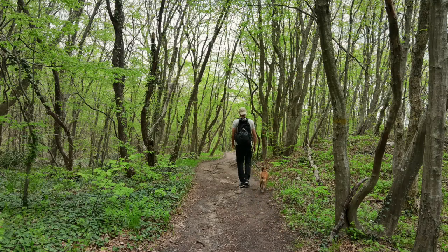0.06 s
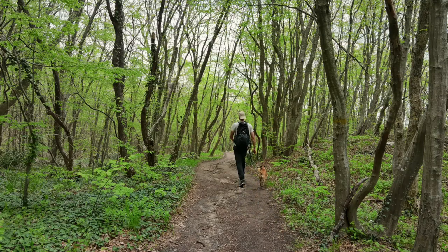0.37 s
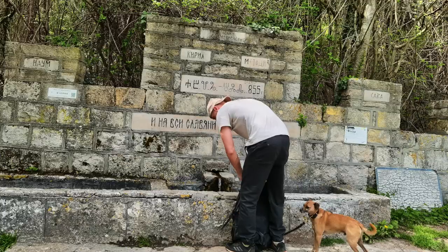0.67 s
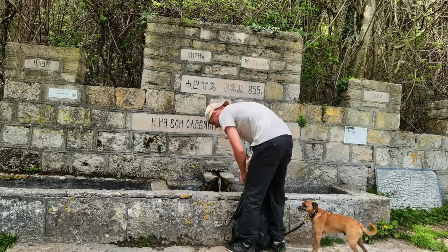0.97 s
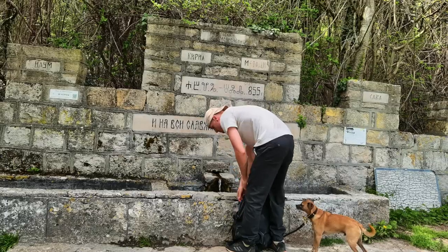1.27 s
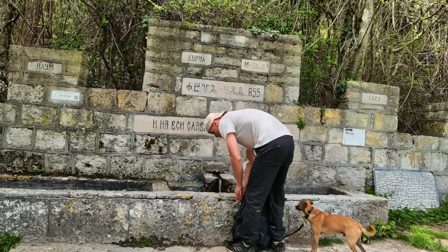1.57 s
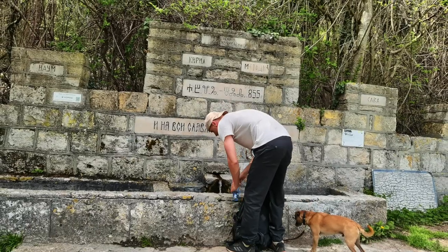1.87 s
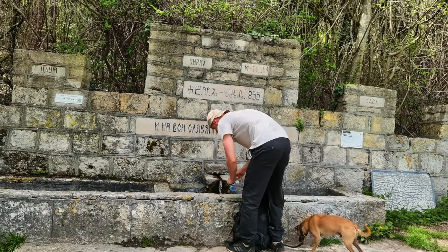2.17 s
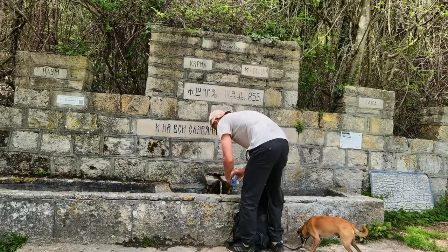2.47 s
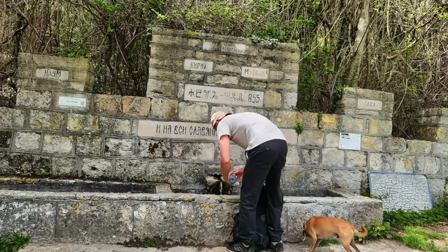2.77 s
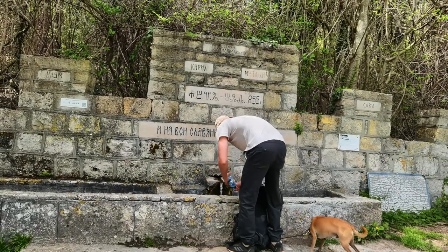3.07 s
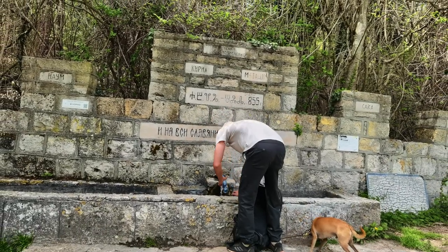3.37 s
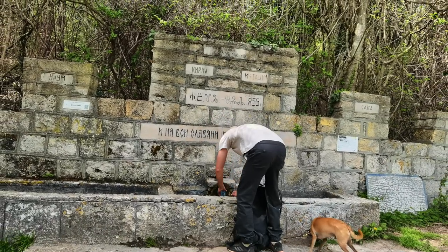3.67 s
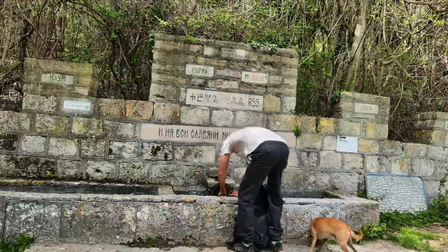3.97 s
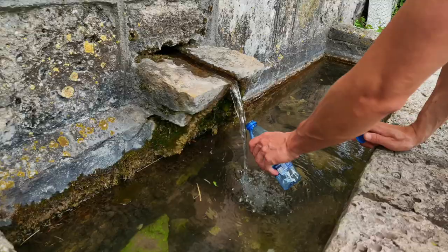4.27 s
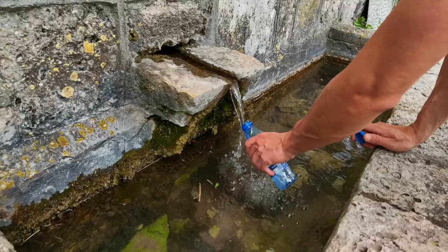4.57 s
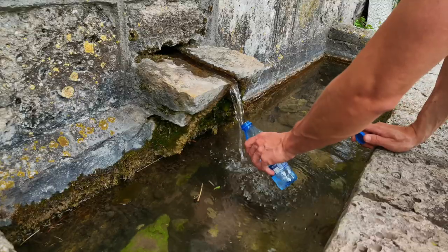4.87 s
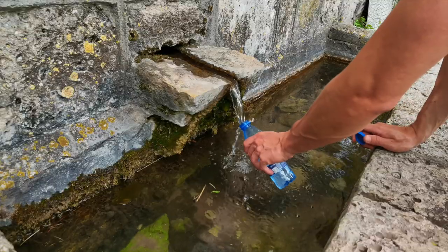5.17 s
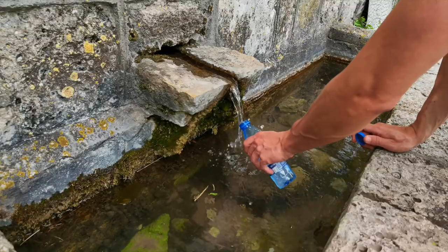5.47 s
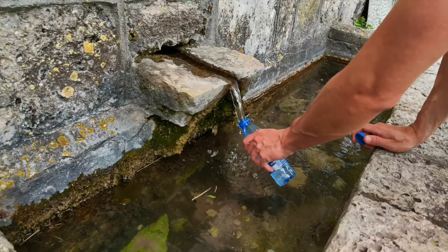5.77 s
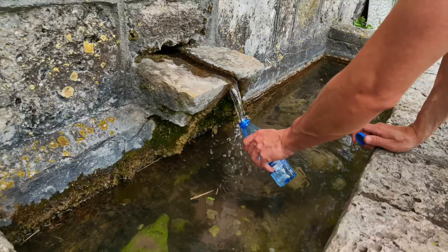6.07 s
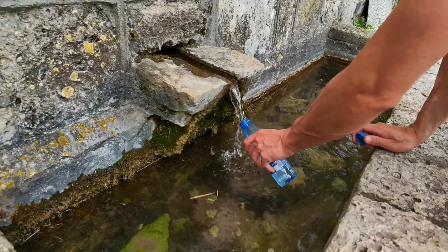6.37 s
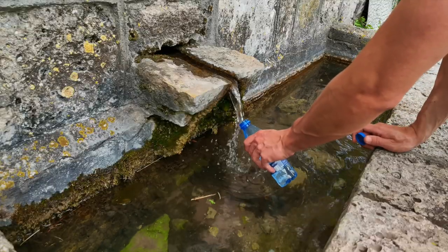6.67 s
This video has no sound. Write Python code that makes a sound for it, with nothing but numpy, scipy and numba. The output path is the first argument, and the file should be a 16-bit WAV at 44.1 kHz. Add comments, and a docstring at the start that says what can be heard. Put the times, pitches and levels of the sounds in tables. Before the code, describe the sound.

Faint footsteps and a distant trickle, then close water splashing from a spout into a trough and filling a plastic bottle.

```python
"""Footsteps crunch along a quiet forest path. At 0.7 s we cut to a stone fountain some metres away: it
trickles and splashes, a bird whistles thinly, feet shift and a plastic bottle ticks in the hand.
At 4.2 s we are at the spout, where the jet splashes round the bottle's neck and into the trough: a swarm
of ringing bubbles and bursting drops that follows the spill, with single gulps and splashes on top.
From about 5 s the jet finds the neck, and the bottle's note climbs as its air space shrinks."""
import sys
import numpy as np
from scipy import signal
from scipy.fft import rfft, irfft
from scipy.io import wavfile
from numba import njit

SR = 44100
rng = np.random.default_rng(int(sys.argv[2]) if len(sys.argv) > 2 else 0)


def digitize_waveform(pressure):
    """Quantize a signal to 16-bit integers and store it at the path in sys.argv[1].

    Rows of a 2-D input are taken as channels; values are limited to [-1, 1].
    """
    field = np.atleast_2d(pressure).T
    bounded = np.clip(field, -1, 1)
    quanta = np.round(bounded * 32767).astype(np.int16)
    wavfile.write(sys.argv[1], SR, quanta)


N = 301110
TIME = np.arange(N) / SR
FOUNTAIN_S, CLOSE_S = .675, 4.18  # the two cuts: to the fountain, then right up to the spout

# how much of the jet spills past the neck, as a fader ride (time [s], level [dB])
SPILL = [(4.25, -49.5), (4.36, -46), (4.4, -46), (4.68, -51.5), (4.95, -45), (5.05, -44), (5.3, -53.5),
         (5.57, -55.5), (6.24, -59.5), (6.45, -63), (6.65, -50), (6.83, -52.5)]
# EQ of the bright spray, the midrange bubbling and the deep churn (frequency [Hz], gain [dB])
SPRAY_EQ = [(1350, -34), (2300, -3), (2510, -11), (3050, -6.5), (3870, -5), (4550, -8), (5220, -3),
            (6760, -4.5), (8840, -9), (10300, -15.5), (13600, -4.5), (15100, -6), (16000, -19)]
BUBBLING_EQ = [(380, -52), (650, -30), (705, -8), (1040, 3), (1140, -7.5), (1310, 3), (1660, -3.5),
               (1970, -4), (2150, -6.5), (2600, -18), (3380, -31), (5720, -120)]
CHURN_EQ = [(180, -29.5), (300, -29), (334, -52), (388, 2), (549, 0.5), (720, -28), (940, -36),
            (1580, -120)]


def jet(full_spill_db=-45):
    """The stream close up: bubble layers from fine mist to the pool's thrum, all riding the spill."""
    spill_db = curve(SPILL) - full_spill_db
    fizz = level(swarm(1500, 2343, 7290, cycles=58, spread_db=7.5))
    patter = level(swarm(3500, 2430, 7650, cycles=20, spread_db=7.5, clump_s=.0015))
    spray = colour(reverb(fizz + patter, t60=.023, wet_db=-2.5), SPRAY_EQ)
    mist = swarm(5200, 7550, 18500, cycles=39, spread_db=6.5, width=1.94, clump_s=.0015)
    mist = colour(reverb(mist, t60=.035, wet_db=11), SPRAY_EQ)
    bubbling = swarm(900, 646, 2640, cycles=23.4, spread_db=4.5)
    bubbling = colour(reverb(bubbling, t60=.044, wet_db=0), BUBBLING_EQ)
    churn = colour(swarm(470, 301.4, 763, cycles=11.7, spread_db=5.5, width=.49), CHURN_EQ)
    drops = drips()
    thrum = swarm(130, 138, 205, cycles=15, spread_db=3.5, width=.33)
    # (layer, level at full spill [dB], growth [dB per dB of spill], pan [dB])
    layers = [(spray, -41.8, 1, 2), (mist, -49, 1.14, -.8), (bubbling, -50.3, .8, 1.2),
              (drops, -58.5, .71, 1), (churn, -50.5, 1.5, 3.5), (thrum, -61, 1.7, 0)]
    out = np.zeros((2, N))
    for layer, db, growth, pan_db in layers:
        add(out, 0, level(layer, db) * undb(growth * spill_db), pan_db)
    return out * after(CLOSE_S)


def drips():
    """Single drops that ring clear of the stream; rms 1."""
    drops = swarm(110, 1000, 5200, cycles=69, spread_db=3, width=.36, per_drop=1)
    return level(reverb(drops, t60=.12, wet_db=-8))


# lumps of water landing
# (time [s], plink pitch [Hz], plink level [dB], spatter level [dB], relative body level [dB])
SPLASHES = [(.71, 3770, -39.5, -66, -60), (0.777, 4480, -58, -43.5, -57), (.8, 3800, -49, -42, -45),
            (1.017, 3800, -50, -48.5, -63), (1.3855, 3800, -43.5, -62, -72), (1.55, 3920, -35.5, -36, -62),
            (2.875, 4240, -51, -44, -51.5), (3.151, 3920, -49.5, -50.5, -72),
            (3.357, 2760, -48.5, -46, -61), (3.428, 3500, -59, -49, -76), (3.522, 3900, -42.5, -47, -72),
            (4.2084, 4280, -46, -26, -31), (4.261, 3700, -44, -47, -26.5), (4.2764, 4530, -50, -25.5, -39),
            (4.3328, 3480, -44, -30.5, -52), (4.428, 2910, -29, -41, -45), (4.499, 3050, -43, -41, -27.5),
            (4.545, 4900, -50, -30.5, -44), (4.5897, 3960, -31.5, -32, -58),
            (4.611, 3980, -38, -26.5, -32.5), (4.7106, 4140, -37, -21.5, -28),
            (4.739, 4630, -43, -26.5, -30), (4.798, 4180, -55, -25, -53), (4.937, 3440, -27.5, -29.5, -26),
            (4.9653, 3100, -27, -48, -46), (4.998, 4100, -38, -30, -32.5), (5.0797, 3860, -27, -29.5, -53),
            (5.17, 3600, -36, -29, -57), (5.553, 3480, -32, -40, -58), (5.6387, 1980, -31, -31.5, -45),
            (5.652, 3700, -26.5, -27.5, -33), (5.702, 3020, -37, -29, -47),
            (5.8016, 5250, -33.5, -37, -31.5), (5.891, 5620, -38.5, -46, -55),
            (6.131, 3835, -28.5, -42, -65), (6.221, 5670, -53, -39, -64), (6.43, 4900, -40.5, -40.5, -63),
            (6.4703, 4070, -53, -32, -67), (6.4878, 2610, -37, -44, -66), (6.542, 3900, -38.5, -30.5, -63),
            (6.631, 4420, -48, -27, -62), (6.66, 3110, -36, -33, -33.5), (6.7, 5060, -31.5, -31.5, -54),
            (6.7045, 3760, -46, -28, -38)]


def splashes(spatter_ratio=1.142, spread=1.451, highest_hz=7300):
    """A lump of water slaps down, traps one plinking bubble and shatters into bubbles of three sizes."""
    out = np.zeros((2, N))
    for s, hz, plink_db, spatter_db, body_db in SPLASHES + stray_splashes():
        top_hz = min(hz * spatter_ratio * spread, highest_hz)
        spatter = burst(top_hz / spread ** 2, top_hz, t60=.0044, spread_s=.0014)
        body = burst(807, 2190, t60=.018, spread_s=.001634)
        mist = burst(9200, 19000, t60=.005, spread_s=.002, width=7)
        mist_db = spatter_db + (-12 if s > CLOSE_S else -24)  # brighter close up
        add(out, s, undb(plink_db) * ring(hz, t60=.02, glide_per_s=6), pan_db=1)
        add(out, s, undb(spatter_db) * spatter, pan_db=3.5)
        add(out, s, undb(body_db - 6.5) * body, pan_db=4)
        add(out, s, undb(mist_db) * mist, pan_db=3)
    return reverb(out, t60=.088, wet_db=-3)


def stray_splashes(per_s=12, lo_hz=3050, hi_hz=4630, over_stream_db=10.5, scatter_db=1):
    """Lesser splashes at random moments, poking just out of the stream; rows as in SPLASHES."""
    span_s, rows = TIME[-1] - FOUNTAIN_S, []
    for when, pitch, force in rng.random((int(per_s * span_s), 3)):
        s = FOUNTAIN_S + when * span_s
        stream_db = curve(SPILL, s) if s > CLOSE_S else curve(TRICKLE, s) + TRICKLE_TRIM_DB
        db = stream_db + over_stream_db + scatter_db * (2 * force - 1)
        rows.append((s, lo_hz * (hi_hz / lo_hz) ** pitch, db - 3.5, db, db - 12))
    return rows


# big air bubbles (time [s], pitch [Hz], level [dB], glide [share of pitch per s])
GULPS = [(.751, 1664, -45, 2.5), (3.888, 1542, -51.5, 1.5), (4.438, 1987, -42, 2.5),
         (4.543, 540, -30.5, 2.5), (4.625, 1276, -34.5, 4), (4.661, 738, -37.5, 12.5),
         (4.672, 1002, -33, 17), (4.842, 491, -24, 3), (4.936, 1146, -34, 3.5), (4.945, 470, -36, 5),
         (5.027, 475, -27, 2), (5.108, 501, -30, 3.5), (5.17, 471, -37, -1.5), (5.193, 488, -31, 4.5),
         (5.723, 522, -26.5, 6), (5.777, 530, -34, 8.5), (5.79, 793, -42, 3.5), (6.154, 1330, -41.5, -1),
         (6.351, 1442, -39, 2), (6.729, 470, -35.5, 4), (6.742, 1312, -37, 3), (6.798, 485, -37, 1.5)]


def gulps(twin_ratio=1.18, twin_late_s=.0056, twin_db=-16.5, pan_db=3.5):
    """Big bubbles gulp and shed a smaller twin; most glide up as they near the surface."""
    out = np.zeros((2, N))
    for (s, hz, db, glide), chance in zip(GULPS, rng.random(len(GULPS))):
        t60 = .091 * (503 / hz) ** .22  # smaller bubbles die sooner
        add(out, s, undb(db) * ring(hz, t60, glide), pan_db)
        twin = undb(db + twin_db) * ring(hz * twin_ratio, t60 / 2)
        add(out, s + twin_late_s * (.5 + chance), twin, pan_db)
    return reverb(out, t60=.066, wet_db=1)


# fader ride of the drumming inside the bottle (time [s], relative level [dB])
DRUMMING = [(4.2, -54.5), (4.9, -51.5), (5.2, -63), (5.4, -50), (5.65, -67.5), (6.12, -59.5), (6.4, -68.5),
            (6.57, -51.5), (6.83, -68)]
# slugs of water that drop down the neck and thump the air inside (time [s], level [dB])
GLUGS = [(4.273, -32.5), (4.331, -33), (4.461, -33.5)]


def bottle(empty_hz=256.6, fill_start_s=5.05, fill_share_per_s=.432, drops_per_s=45):
    """Drops and slugs of water drum inside the bottle and ring its shrinking air space."""
    filled = np.clip(fill_share_per_s * (TIME - fill_start_s), 0, .9)
    hz = empty_hz / np.sqrt(1 - filled)  # the note goes as one over the root of the air volume
    drops = rng.uniform(-.64, 1, N) * (rng.random(N) < drops_per_s / SR)
    hum = level(band(cavity(drops, hz, width_hz=32.), 270, 610), -2.9)
    out = np.zeros((2, N))
    add(out, 0, hum * undb(curve(DRUMMING)) * after(CLOSE_S), pan_db=3)
    for s, db in GLUGS:
        add(out, s, undb(db) * ring(np.interp(s, TIME, hz), t60=.12), pan_db=.5)
    return out


# fader ride of the distant stream (time [s], level before the trim [dB])
TRICKLE = [(0.8, -70.5), (0.88, -71), (1.52, -75.5), (1.62, -71), (2.76, -74.5), (3.01, -72), (3.24, -74.5),
           (4.1, -72.5)]
TRICKLE_TRIM_DB = 6.5
# EQ of its fine bubbles (frequency [Hz], gain [dB])
TRICKLE_EQ = [(1350, -40), (2300, -7.5), (2490, -25.5), (2790, -4.5), (3370, -26.5), (3770, -5),
              (4440, -14), (6140, -11), (7700, -25.5), (9060, -27), (10100, -32.5), (12800, -21.5),
              (16000, -24.5)]


def trickle(drips_db=-10):
    """The stream from afar, its bubbles blurred by the trough and the wall."""
    plinks = level(swarm(1200, 2343, 7780, cycles=100, spread_db=7, width=.41))
    patter = level(swarm(8000, 2405, 17300, cycles=17, spread_db=2, width=.57, clump_s=.0043), .23)
    fine = level(colour(reverb(plinks + patter, t60=.013, wet_db=-2), TRICKLE_EQ), .85)
    coarse = swarm(570, 917, 2206, cycles=11.4, spread_db=8.5, width=.42)
    coarse = level(reverb(coarse, t60=.04, wet_db=6), -6)
    stream = fine + coarse + undb(drips_db) * drips()
    out = np.zeros((2, N))
    add(out, 0, stream * undb(curve(TRICKLE) + TRICKLE_TRIM_DB), pan_db=2)
    return out * after(FOUNTAIN_S) * (1 - after(CLOSE_S))


# distant spray off the bottle and, at 2.5 s, the high fizzy tail of a plastic crackle
# (time [s], length [s], band centre [Hz], level [dB])
FIZZ_SWELLS = [(1.558, .34, 6360, -66), (2.507, .095, 13300, -66), (2.83, .36, 3750, -66.5),
               (2.86, .21, 6020, -60)]


def fizz_swells(spread=1.2, clicks_per_s=1500):
    """Dense tiny clicks blur into a band of fizz that swells and fades."""
    out = np.zeros((2, N))
    for s, length, hz, db in FIZZ_SWELLS:
        progress = np.linspace(0, 1, int(length * SR))
        clicks = noise(len(progress), .75) * (rng.random(len(progress)) < clicks_per_s / SR)
        edges_hz = hz / spread, hz * spread
        fizz = level(band(band(clicks, *edges_hz), *edges_hz), db)
        add(out, s, fizz * np.sin(np.pi * np.sqrt(progress)), pan_db=2.5)
    return out


# footfalls on earth and grit (time [s], relative level [dB], grit send [dB], decay t60 [s])
STEPS = [(.061, -55, -27, 0.12), (.078, -50.5, -19.5, 0.13), (.465, -58.5, -33, 0.074),
         (.547, -58, -22.5, 0.087), (1.613, -57.5, -13, .07), (1.655, -60.5, -6, 0.1)]
# EQ of grit under a sole (frequency [Hz], gain [dB])
GRIT_EQ = [(1500, -9), (2800, 11.5), (6000, 0), (7500, -10), (10500, -12), (13500, -4.5), (16000, -6)]


def footsteps(attack_s=.0012, toe_s=.026, toe_db=-4, heel_grit_db=6, toe_grit_db=15):
    """Heel, then toe: each scuffs the earth, and the softer toe grinds more grit."""
    t = np.arange(SR // 5) / SR
    scuffs, grit = np.zeros((2, 2, N))
    for s, db, grit_db, t60 in STEPS:
        for late_s, part_db, grind_db in ((0, 0, heel_grit_db), (toe_s, toe_db, toe_grit_db)):
            press = undb(db + part_db) * decay(t, t60) * (1 - np.exp(-t / attack_s))
            crumbs = noise(len(t), .32) * rng.exponential(1, len(t))
            scuff = undb(6.5) * band(crumbs, 400, 880) + undb(2) * band(noise(len(t), .34), 1500, 2240)
            add(scuffs, s + late_s, scuff * press, pan_db=2)
            crunch = noise(len(t), .76) * rng.exponential(1, len(t))
            add(grit, s + late_s, crunch * undb(grit_db + grind_db) * press)
    return scuffs + colour(grit, GRIT_EQ)


# three low thuds of footfalls, then a few dull knocks and pops
# (time [s], pitch [Hz], relative level [dB], decay t60 [s])
THUDS = [(.574, 272, -48, 0.042), (1.615, 254, -48, 0.041), (1.768, 263, -48.5, 0.032),
         (3.6274, 308, -26.5, 0.01), (3.635, 107, -39.5, 0.04), (4.0197, 940, -35, 0.0044),
         (4.153, 1030, -36, 0.0069)]


def thuds():
    """Each thud, knock or pop is one dry, quickly damped tone."""
    out = np.zeros((2, N))
    for s, hz, db, t60 in THUDS:
        add(out, s, undb(db + 9.5) * ring(hz, t60))
    return out


# crackles of thin plastic (time [s], relative level [dB])
TICKS = [(1.5498, -34), (1.556, -32.5), (1.634, -40), (1.7742, -26), (2.512, -32.5), (2.6393, -41.5),
         (3.4945, -35.5), (3.687, -39)]


def plastic_ticks(t60=.072):
    """The handled bottle ticks in bright snaps of noise."""
    out, t = np.zeros((2, N)), np.arange(SR // 20) / SR
    for s, db in TICKS:
        snap = band(noise(len(t), .43), 4500, 6480)
        sheen = undb(-21.5) * band(noise(len(t), 1), 8100, 16000)
        add(out, s, undb(db - 10) * (snap + sheen) * decay(t, t60), pan_db=2.5)
    return reverb(out, t60=.067, wet_db=-10)


# shifts of weight at the trough (time [s], rustle level [dB], decay t60 [s])
SHUFFLE = [(0.679, -61.5, 0.43), (0.761, -65, 1.55), (.93, -65, 0.38), (1.24, -64.5, 0.22),
           (1.625, -58, 0.61), (1.76, -54, 0.094)]


def shuffle(attack_s=.0048, scrape_db=-2.5):
    """With each shift of weight, cloth rustles low and soles grind on the paving."""
    effort = np.zeros(N)
    for s, db, t60 in SHUFFLE:
        t = np.maximum(TIME - s, 0)
        effort += undb(db) * (1 - np.exp(-t / attack_s)) * decay(t, t60)
    cloth = level(swarm(500, 147, 353, cycles=6.1, spread_db=-.5, width=.36))
    scrape = level(swarm(1100, 636, 2060, cycles=7.1, spread_db=5), scrape_db)
    return (cloth + scrape) * effort


# bird calls (time [s], length [s], pitch [Hz], level [dB])
WHISTLES = [(0.716, 0.11, 4520, -56.5), (1.875, 0.14, 4503, -52.5), (3.805, 0.153, 4507, -56)]


def bird(droop=.0036, waver=.0047, flutter_db=2.5, echo_s=.072, echo_db=-12):
    """A thin, almost level whistle that lingers among the trees."""
    out = np.zeros((2, N))
    for s, length, hz, db in WHISTLES:
        progress = np.linspace(0, 1, int(length * SR))
        bend, swell = (np.interp(progress, np.linspace(0, 1, 20), row)
                       for row in rng.standard_normal((2, 20)))
        pitch = hz * (1 + droop * (.5 - progress) + waver * bend)
        envelope = undb(db + flutter_db * swell) * np.sqrt(np.abs(np.sin(np.pi * progress)))
        note = envelope * np.sin(2 * np.pi * np.cumsum(pitch) / SR)
        add(out, s, note, pan_db=5)
        add(out, s + echo_s, note * undb(echo_db))
    return reverb(out, t60=.46, wet_db=-5, predelay_s=.0175)


# EQ of the beds: forest air, fountain yard and rumble at the spout (frequency [Hz], gain [dB])
FOREST_EQ = [(13, -52), (22, -19), (69, -7), (126, -15.5), (201, -20.5), (356, -23.5), (420, -32),
             (877, -34.5), (1090, -36), (1220, -36.5), (2690, -44), (15000, -63.5)]
YARD_EQ = [(13, -50), (22, -16), (53, 1.5), (109, -1), (160, -12), (251, -3.5), (293, -10), (520, -16.5),
           (736, -26), (1040, -23.5), (1400, -27), (1820, -20), (3080, -120)]
RUMBLE_EQ = [(13, -81), (22, -42), (48, 3), (70, 0.5), (134, -3), (200, -16.5), (260, -66), (440, -120)]


def ambience():
    """Low outdoor rumble and faint hiss, with its own tone at each spot."""
    forest = level(colour(noise(N, .52), FOREST_EQ), -64.5)
    yard = level(colour(noise(N, .35), YARD_EQ), -65.5)
    rumble = level(colour(noise(N, .19), RUMBLE_EQ), -59.5)
    return forest * (1 - after(FOUNTAIN_S)) + yard * after(FOUNTAIN_S) + rumble * after(CLOSE_S)


def swarm(per_s, lo_hz, hi_hz, cycles, spread_db, width=1., clump_s=.006, per_drop=3):
    """Drops land at random; each traps bubbles of unrelated sizes that ring for about `cycles`."""
    drops = int(per_s * N / SR / per_drop)
    draws = rng.random((drops, 6 * per_drop + 2))
    when, force = (np.repeat(draws[:, k], per_drop) for k in (0, 1))
    delay, pitch, life, rise, pan, lag = draws[:, 2:].reshape(drops * per_drop, -1).T
    starts = (when * N - np.log(1 - delay) * clump_s * SR).astype(np.int64)
    hz = lo_hz * (hi_hz / lo_hz) ** pitch
    t60 = cycles * 2 ** (2 * life - 1) / hz
    gain = undb(spread_db * np.minimum(-np.log(1 - force), 4)) * hz / lo_hz
    return grains(starts, hz, t60, .13 * rise ** 2, gain, width * (pan - .5), 5 * width * (lag - .5))


@njit
def grains(starts, hz, t60, rise, gain, pan, lag):
    """Sum of small rising rings, each placed between the ears by pan and a lag in samples."""
    out = np.zeros((2, N))
    for k in range(len(starts)):
        omega, damping = 2 * np.pi * hz[k] / SR, 6.9 / (t60[k] * SR)
        count = int(t60[k] * SR)
        phasor, step = gain[k] + 0j, np.exp(-damping + 1j * omega)
        glide = np.exp(1j * omega * rise[k] / (count + 1))
        ear_shift = np.exp(1j * omega * lag[k])
        mute, ease = 1., np.exp(-omega / 3)  # softens the attack
        for i in range(starts[k], min(starts[k] + count, N)):
            out[0, i] += (1 - mute) * phasor.imag * (1 + pan[k])
            out[1, i] += (1 - mute) * (phasor * ear_shift).imag * (1 - pan[k])
            phasor, step, mute = phasor * step, step * glide, mute * ease
    return out


def burst(lo_hz, hi_hz, t60, spread_s, width=1., count=14):
    """A handful of tiny bubbles born within moments of each other; peak 1 in mono."""
    out = np.zeros((2, SR // 8))
    for pitch, delay, side in rng.random((count, 3)):
        late = -np.log(1 - delay)
        bubble = np.exp(-late / 2) * ring(lo_hz * (hi_hz / lo_hz) ** pitch, t60)
        add(out, late * spread_s, bubble, pan_db=12 * width * (side - .5))
    return out / np.abs(out.mean(0)).max()


def ring(hz, t60, glide_per_s=0, attack_cycles=.95):
    """A damped sine whose pitch can glide as it dies."""
    t = np.arange(int(t60 * SR) + 2) / SR
    envelope = (1 - np.exp(-t * hz / attack_cycles)) * decay(t, t60)
    return envelope * np.sin(2 * np.pi * hz * t * (1 + glide_per_s * t / 2))


@njit
def cavity(x, hz, width_hz):
    """One resonance whose pitch moves."""
    out, phasor = np.zeros(N), 0j
    for i in range(N):
        phasor = phasor * np.exp((2j * hz[i] - width_hz) * np.pi / SR) + x[i]
        out[i] = phasor.imag
    return out


def reverb(x, t60, wet_db, predelay_s=.0027):
    """Add dense reflections from nearby surfaces, unrelated left and right."""
    t = np.arange(SR // 3) / SR
    scatter = band(rng.standard_normal((2, len(t))), 1200, 15000)
    tail = scatter * decay(t, t60) * (t > predelay_s)
    tail *= undb(wet_db) / np.sqrt(np.sum(tail ** 2) / 2)
    return x + signal.fftconvolve(x, tail, axes=1)[:, :N]


def colour(x, eq, size=8192):
    """Minimum-phase EQ through (frequency [Hz], gain [dB]) points."""
    hz, db = np.transpose(eq)
    grid = np.maximum(np.fft.rfftfreq(size, 1 / SR), 1)
    cepstrum = irfft(np.log(undb(np.interp(np.log(grid), np.log(hz), db))))
    cepstrum[1:size // 2] *= 2
    cepstrum[size // 2 + 1:] = 0
    return signal.fftconvolve(x, irfft(np.exp(rfft(cepstrum)))[None], axes=1)[:, :N]


def band(x, lo_hz, hi_hz):
    """Causal band-pass."""
    return signal.sosfilt(signal.butter(2, [lo_hz, hi_hz], "band", fs=SR, output="sos"), x)


def noise(size, width):
    """Stereo noise; width is side over mid."""
    mid, side = rng.standard_normal((2, size))
    return np.array([mid + width * side, mid - width * side]) / np.hypot(1, width)


def add(out, s, sound, pan_db=0):
    """Mix a sound in at a time; positive pan is left."""
    i = max(int(s * SR), 0)
    part = (sound * undb(np.array([[pan_db], [-pan_db]]) / 2))[:, :N - i]
    out[:, i:i + part.shape[1]] += part


def curve(table, s=TIME):
    """Read a fader ride at the given times."""
    return np.interp(s, *np.transpose(table))


def after(s):
    """A 10 ms fade-in centred on a cut."""
    return np.clip((TIME - s) * 100 + .5, 0, 1)


def decay(t, t60):
    """Free decay, 60 dB down at t60."""
    return np.exp(-np.log(1000) * t / t60)


def level(x, db=0):
    """Scale to an rms level."""
    return x * undb(db) / np.sqrt(np.mean(x ** 2))


def undb(db):
    """Decibels to gain."""
    return 10 ** (np.asarray(db) / 20)


def scene():
    """The mix: water up front, over the ambience, the bird and the foley."""
    foreground = trickle() + fizz_swells() + jet() + bottle() + gulps() + splashes()
    return foreground + ambience() + bird() + footsteps() + shuffle() + plastic_ticks() + thuds()


def record(dry, top_hz=15900):
    """A steep high cut on the master."""
    return signal.sosfilt(signal.ellip(10, .2, 70, top_hz, fs=SR, output="sos"), dry)


dry = scene()
out = record(dry)
digitize_waveform(out)
```